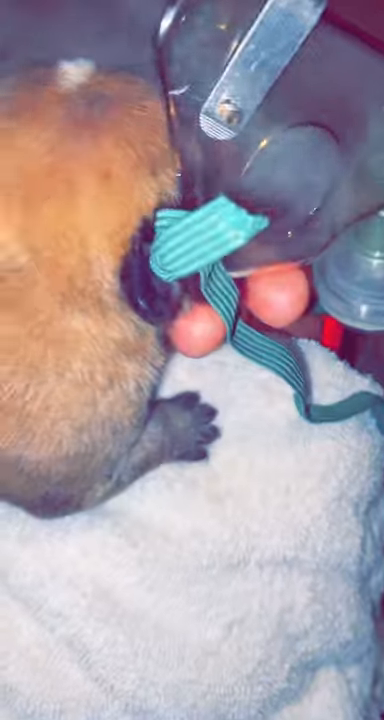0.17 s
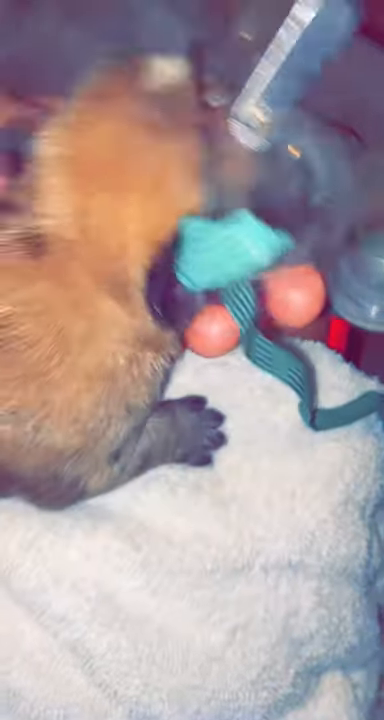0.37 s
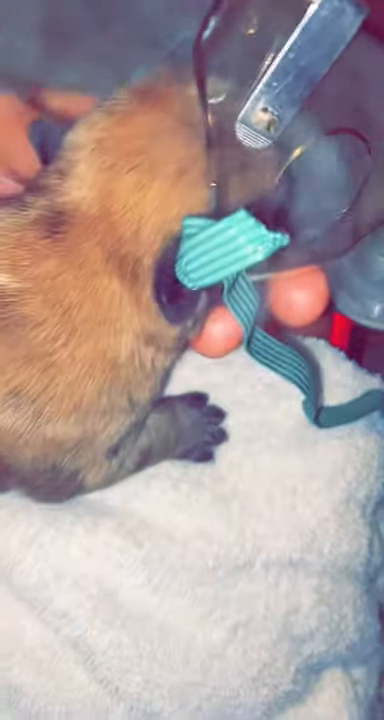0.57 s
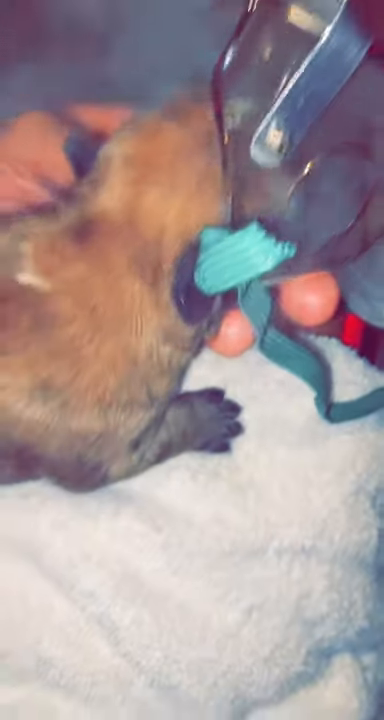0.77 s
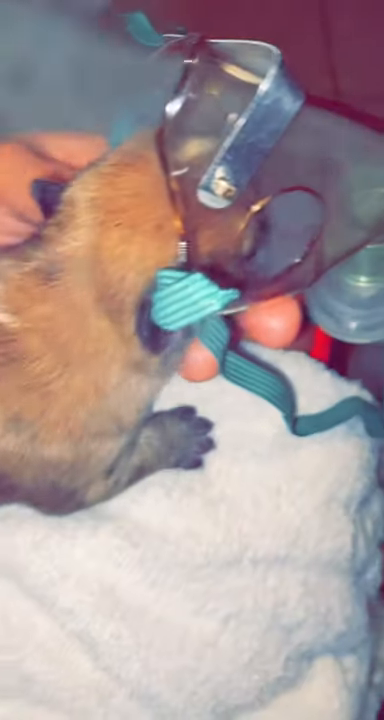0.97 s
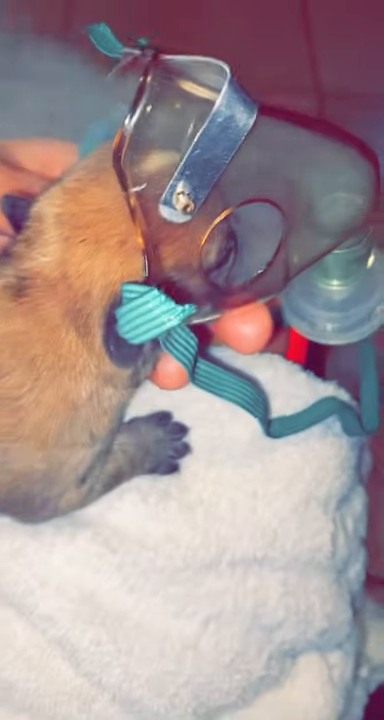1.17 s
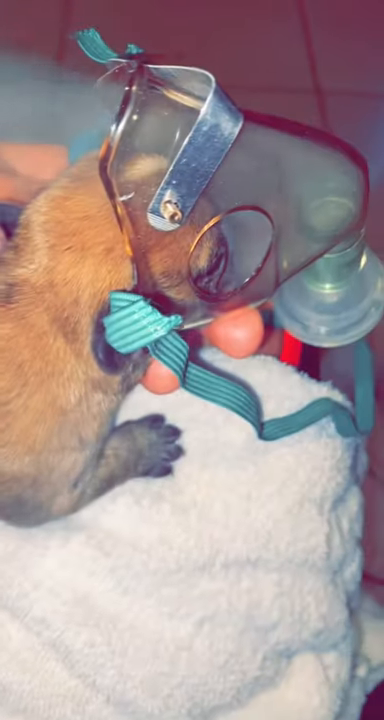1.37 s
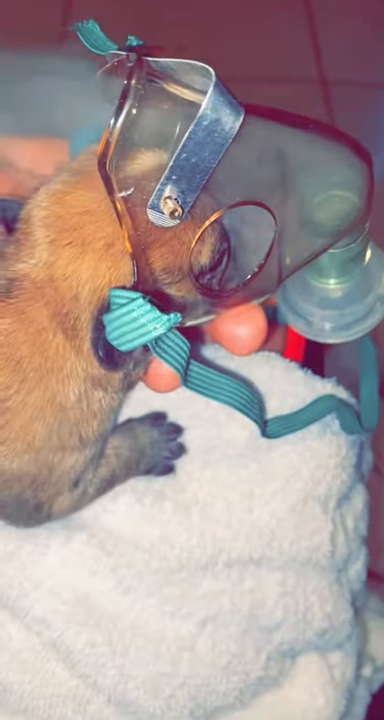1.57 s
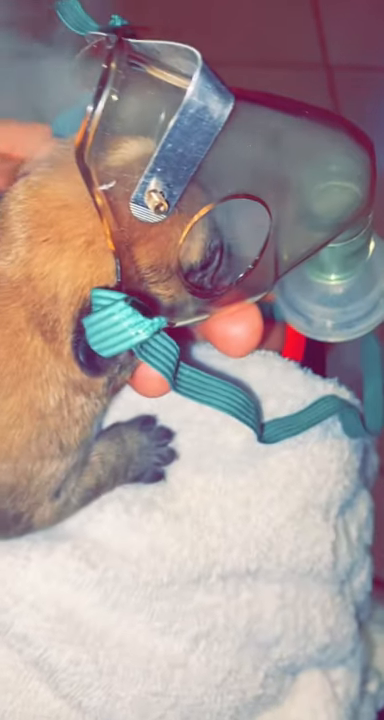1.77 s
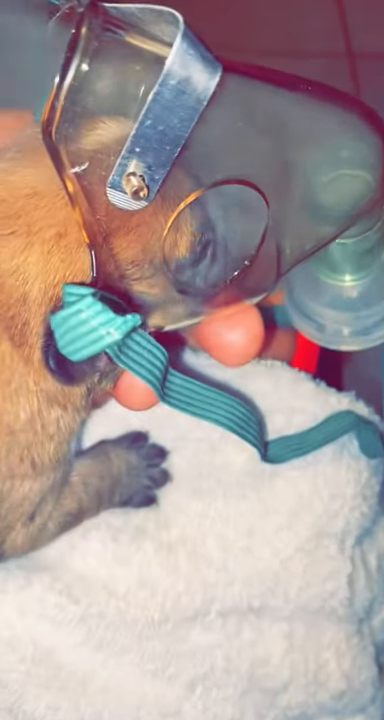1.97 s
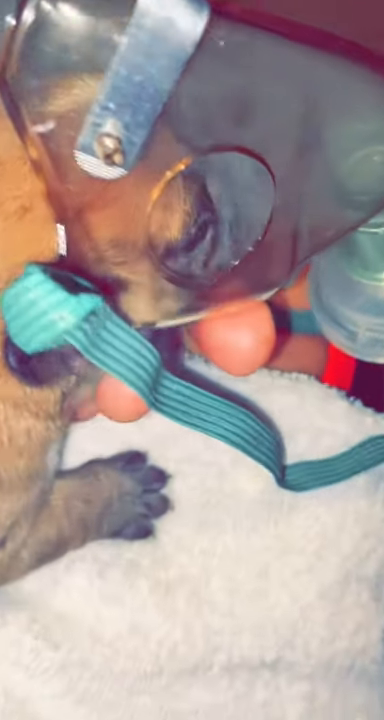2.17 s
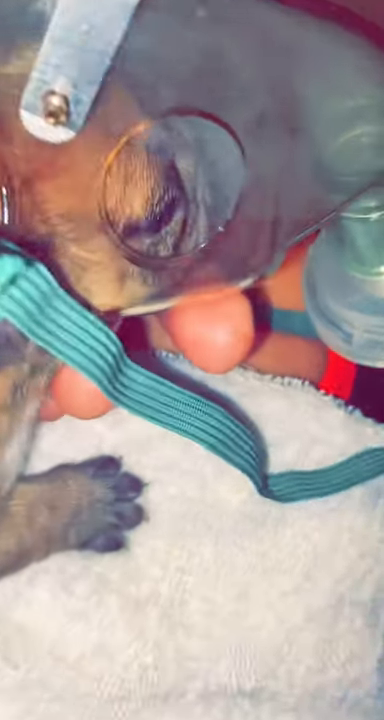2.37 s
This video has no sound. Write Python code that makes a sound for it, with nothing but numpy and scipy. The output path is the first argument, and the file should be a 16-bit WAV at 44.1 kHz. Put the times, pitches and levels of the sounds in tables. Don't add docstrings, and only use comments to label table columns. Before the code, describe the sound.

A nebulizer compressor drones steadily with a rapid, buzzing throb and faint valve rattle, while air hisses through a mask; the hiss dulls as it turns away, and liquid spits midway. Close phone microphone, indoors.

```python
import sys
import numpy as np
from scipy import signal
from scipy.fft import rfft, irfft, next_fast_len
from scipy.io import wavfile
from scipy.ndimage import uniform_filter1d, map_coordinates

SR = 44100
rng = np.random.default_rng(int(sys.argv[2]) if len(sys.argv) > 2 else 0)


def invert_db(level):
    return 10 ** (np.asarray(level, dtype=float) / 20)


def log_audio(samples):
    frames = np.atleast_2d(samples).T
    limited = np.clip(frames, -1, 1)
    pcm = np.round(limited * 32767).astype(np.int16)
    wavfile.write(sys.argv[1], SR, pcm)


N = 111573
SHAFT_HZ = 53.86
FIRST_S, OPEN_S = .0135, .0795

# start_s, level_db
STROKE_LEVEL = [(.09, -28), (.2, -22.5), (.36, -29), (.49, -22), (.6, -27.5), (.85, -23), (1.0, -25),
                (1.12, -24.5), (1.28, -22), (1.4, -26), (1.6, -26), (1.72, -22.5), (1.82, -23.5),
                (1.96, -27), (2.15, -26.5), (2.3, -24), (2.5, -26)]
# multiple, level_db
HOUSING = [(5, -23), (6, -22.5), (7, -34), (8, -23), (9, -23), (10, -25.5), (11, -6.5), (12, 0.5), (13, -2),
           (14, -12.5), (15, -34), (16, -20.5), (17, -18.5), (18, -34.5), (19, -33.5), (20, -21.5),
           (21, -31), (22, -24), (23, -27), (24, -29), (25, -24), (26, -47), (27, -30.5), (28, -26),
           (29, -29), (30, -26.5), (31, -28.5), (32, -31), (33, -40)]
# multiple, level_db
UNBALANCE = [(1, -44.5), (2, -39.5), (3, -48.5), (4, -39.5)]
# pitch_hz, level_db
WINDING_HUM = [(120, -43), (240, -44)]
# pitch_hz, level_db
REED_TONES = [(2907, -47.5), (3015, -51), (3284, -48), (3391, -53.5), (3714, -50.5), (3768, -75),
              (3876, -52.5), (3930, -53), (4038, -54), (4091, -54), (4145, -58), (4199, -50), (4360, -51),
              (4468, -49.5)]
# pitch_hz, level_db
INTAKE_COLOUR = [(22, -38), (45, -10.5), (125, -11), (180, -13.5), (300, -4.5), (570, -4.5), (950, -8.5),
                 (1700, -19.5), (2400, -24)]
# pitch_hz, width_hz, level_db
MUFFLER_PEAKS = [(127, 9, 0), (301, 29, -3.5), (512, 59, -2.5), (570.6, 44, 1.5), (638, 25, 2),
                 (779, 104, -1.5), (948, 100, -2)]
# start_s, level_db, turned_away_0_to_1, churning_db
JET_COURSE = [(.09, -22.5, 0.05, -4), (.24, -27, 0.2, 5), (.36, -23, 0.24, -4), (.55, -25.5, 0.1, 1),
              (.68, -25.5, 0.14, 3), (.8, -26, 0.3, 2.5), (1.0, -28, 0.63, 4.5), (1.27, -28.5, 0.97, 0.5),
              (1.5, -28.5, 1, -3.5), (1.75, -28, 1, 4), (1.95, -28, 1, -3), (2.25, -28, 0.92, 2),
              (2.5, -27, 0.6, -2.5)]
# pitch_hz, width_hz, level_db
MASK_FACING = [(2280, 360, -7), (3000, 320, -1), (4120, 1100, -4.5), (5176, 420, 2.5), (6570, 290, -7),
               (7900, 325, 2.5), (10800, 600, -56.5), (11540, 230, -11.5), (15200, 900, -4)]
# pitch_hz, width_hz, level_db
MASK_TURNED = [(2315, 380, -5), (2950, 390, -3), (4400, 770, -7), (4778, 39, -0.5), (5540, 790, -9),
               (6770, 420, -2), (7900, 200, 1), (10650, 140, -14), (12140, 296, -3.5), (15300, 600, -7.5)]
# pitch_hz, width_hz, level_db
PHONE_SHADOW = [(14250, 1200, -22), (13600, 600, -18)]
# pitch_hz, level_db
MIC_PORT = [(1000, -14), (2000, 2), (8300, -1), (9500, -6), (12000, -0.5), (15800, -3.5)]
# start_s, peak_db, pitch_hz
SPIT_EVENTS = [
    (1.2371, -18.5, 3270),
    (1.2535, -26, 3000),
    (1.28, -11, 2950),
    (1.2952, -12, 3750),
    (1.297, -11, 3150),
    (1.407, -24, 7900),
]


def compressor():
    return housing_thumps() + reed_rattle() + steady_hum() + intake_breath()


def housing_thumps():
    lines = []
    for k, db in HOUSING:
        off = k - 12
        phase = 0.8 * off ** 2 - 0.42 * off ** 3 + 0.0205 * off ** 2 * rng.standard_normal()
        lines.append((k * SHAFT_HZ, db, phase))
    thump = tones(lines, waver_db=1.85, waver_rad=0.34, rate=8.99)
    limp = 1 + 0.062 * wobble(4.46) * np.cos(shaft_angle() / 2)
    return invert_db(curves(STROKE_LEVEL)[0]) * limp * thump


def reed_rattle():
    lines = []
    for hz, db in REED_TONES:
        on_shaft_hz = round(hz / SHAFT_HZ) * SHAFT_HZ
        lines.append((on_shaft_hz, db, 2 * np.pi * rng.random()))
    return tones(lines, waver_db=4.2, waver_rad=0.98, rate=7.94)


def steady_hum():
    shake = [(k * SHAFT_HZ, db, 0) for k, db in UNBALANCE]
    winding = [(hz, db, 2 * np.pi * 0.29) for hz, db in WINDING_HUM]
    return tones(shake + winding, waver_db=0.36, waver_rad=0.055, rate=4.24)


def intake_breath():
    def muffled(hz):
        return np.hypot(invert_db(along(INTAKE_COLOUR, hz)), resonances(MUFFLER_PEAKS, hz) ** 2)

    rush = unit(filtered(patchy(depth_db=1.0, streak_db=1.4), muffled))
    return invert_db(-28 + 0.5 * np.cos(shaft_angle())) * rush


def jet():
    level_db, turned, _ = curves(JET_COURSE)
    turned = np.clip(turned, 0, 1)
    pulse_db = 0.75 * np.cos(shaft_angle(lag_s=.002))
    air = patchy(depth_db=1.26, streak_db=2.5) * invert_db(0.4 * wobble(14) + pulse_db)

    def through_mask(peaks, shadow):
        notch_hz, width_hz, notch_db = shadow

        def response(hz):
            dip_db = notch_db * np.exp(-(2 * (hz - notch_hz) / width_hz) ** 2)
            return resonances(peaks, hz) * invert_db(along(MIC_PORT, hz) + dip_db)

        return unit(filtered(air, response))

    facing = through_mask(MASK_FACING, PHONE_SHADOW[0])
    away = through_mask(MASK_TURNED, PHONE_SHADOW[1])
    return invert_db(level_db - 1.0) * ((1 - turned) * facing + turned * away)


def bubbles():
    count = int(400 * N / SR)
    at = (rng.random((count, 1)) * (N - 1)).astype(int)
    chance = rng.random((count, 1))
    hz = 3000 * np.exp(0.081 * rng.standard_normal((count, 1)))
    t = np.arange(700) / SR
    life = t * hz / 16.8
    size_db = -2.5 * np.log(chance + 0.00056) + 1.4 * wobble(13.65)[at] + curves(JET_COURSE)[2][at]
    swell = life * np.exp(-3 * life)
    chirps = invert_db(size_db) * swell * np.sin(2 * np.pi * hz * t * (1 + 0.055 * life))
    places = at + np.arange(700)
    out = np.bincount(places.ravel(), chirps.ravel(), N + 700)
    return invert_db(-37) * unit(out)[:N] + spits()


def spits():
    t = np.arange(700) / SR
    out = np.zeros(N + 700)
    for start_s, peak_db, hz in SPIT_EVENTS:
        fade = invert_db(peak_db - 60 * t / .009) * (1 - np.exp(-t / 0.00049))
        out[round(start_s * SR):][:700] += fade * np.sin(2 * np.pi * hz * t)
    return out[:N]


def shaft_angle(lag_s=0):
    return 2 * np.pi * SHAFT_HZ * (np.arange(N) / SR - FIRST_S - lag_s)


def tones(lines, waver_db, waver_rad, rate):
    t = np.arange(N) / SR - FIRST_S
    out = np.zeros(N)
    for hz, db, phase in lines:
        level = np.sqrt(2) * invert_db(db + waver_db * wobble(rate))
        out += level * np.cos(2 * np.pi * hz * t + phase + waver_rad * wobble(rate))
    return out


def patchy(depth_db, streak_db):
    z = signal.stft(rng.standard_normal(N + 512), nperseg=512)[2]

    def field(high, long):
        rough = uniform_filter1d(rng.standard_normal(z.shape), size=high, axis=0)
        return unit(uniform_filter1d(rough, size=long, axis=1))

    gain_db = depth_db * field(6, 10) + streak_db * field(1, 40)
    return signal.istft(z * invert_db(gain_db), nperseg=512)[1][:N]


def resonances(peaks, hz):
    power = 0
    for c, w, db in peaks:
        power = power + invert_db(2 * db) * (hz * w) ** 2 / ((c * c - hz * hz) ** 2 + (hz * w) ** 2)
    return np.sqrt(power)


def filtered(x, response):
    m = next_fast_len(N + SR // 2)
    return irfft(rfft(x, m) * response(np.fft.rfftfreq(m, 1 / SR)), m)[:N]


def along(points, hz):
    f, v = np.transpose(points)
    return np.interp(np.log(hz + 1), np.log(f + 1), v, left=-70, right=-70)


def curves(rows):
    s, *cols = np.transpose(rows)
    return [np.interp(np.arange(N) / SR, s, c) for c in cols]


def wobble(rate):
    knots = rng.standard_normal(int(N * rate / SR) + 4)
    return map_coordinates(knots, [np.arange(N) * rate / SR])


def unit(x):
    return x / np.sqrt(np.mean(x ** 2) + 1e-20)


def thinned(x, top_hz):
    hz, _, z = signal.stft(x, SR, nperseg=1024)
    power = uniform_filter1d(uniform_filter1d(abs(z) ** 2, size=10, axis=0), size=3, axis=1)
    treble = (hz > 8500) & (hz < top_hz)
    faint = treble[:, None] & (power < invert_db(2 * -14.5) * power[treble].mean())
    return signal.istft(z * ~faint, SR, nperseg=1024)[1][:N]


def scene():
    return np.tile(compressor() + jet() + bubbles(), (2, 1))


def roll_off(x):
    return signal.sosfilt(signal.butter(12, 17090, fs=SR, output="sos"), x)


def record(dry):
    top_hz = 15720
    opening = np.clip((np.arange(N) / SR - OPEN_S) / 0.00055, 0, 1)
    heard = thinned(dry[0] * opening, top_hz)
    mix = np.tile(filtered(heard, lambda hz: hz < top_hz), (2, 1))
    return roll_off(mix)


dry = scene()
out = record(dry)
log_audio(out)
```